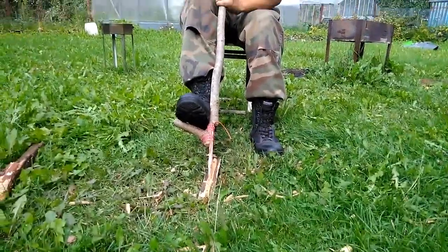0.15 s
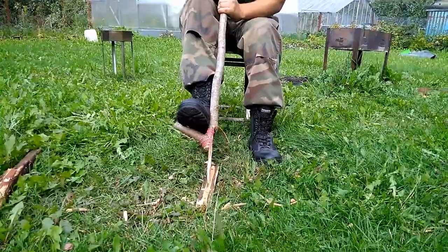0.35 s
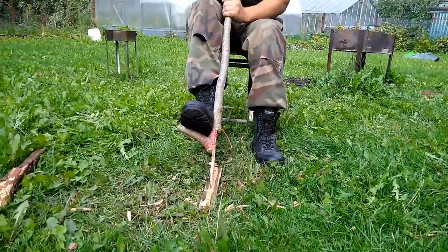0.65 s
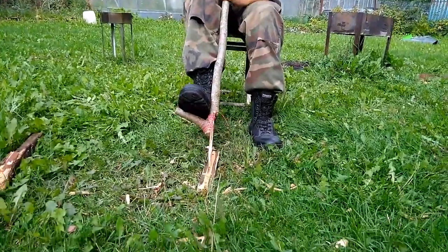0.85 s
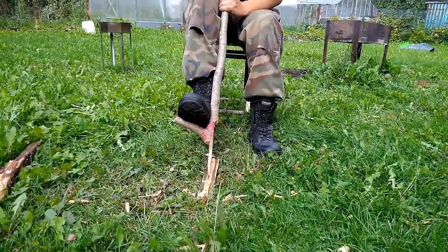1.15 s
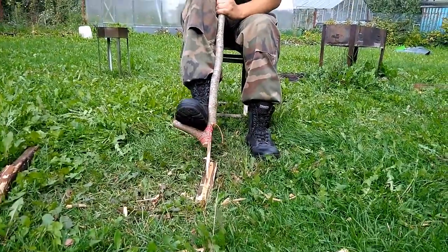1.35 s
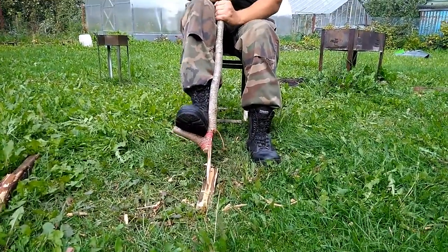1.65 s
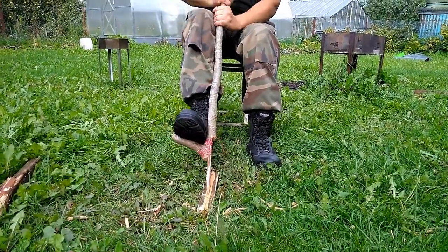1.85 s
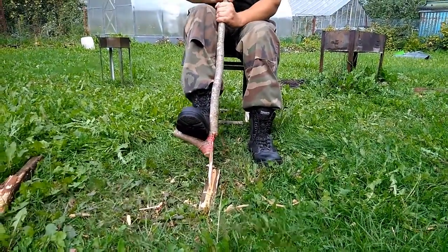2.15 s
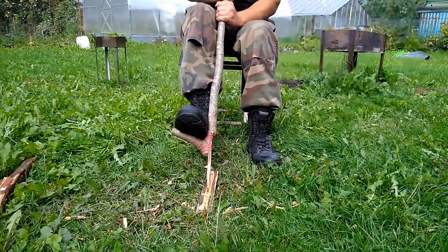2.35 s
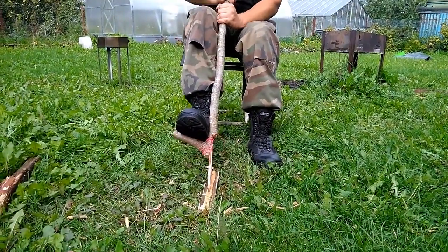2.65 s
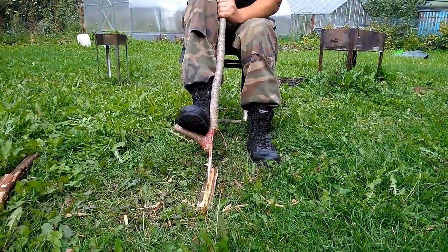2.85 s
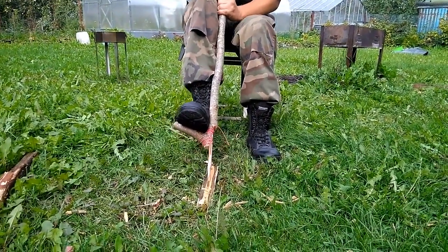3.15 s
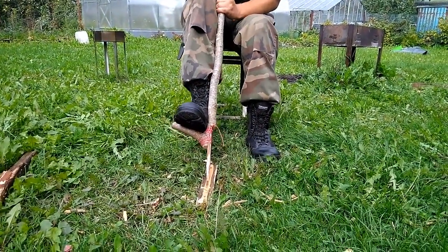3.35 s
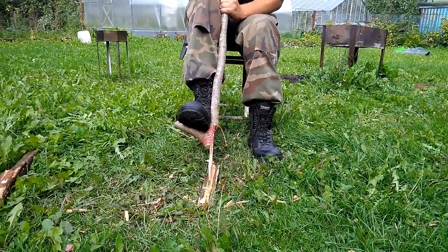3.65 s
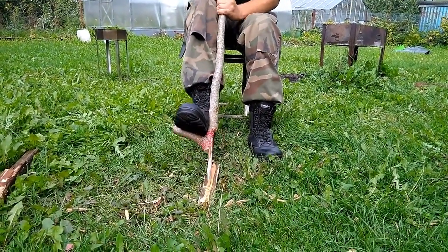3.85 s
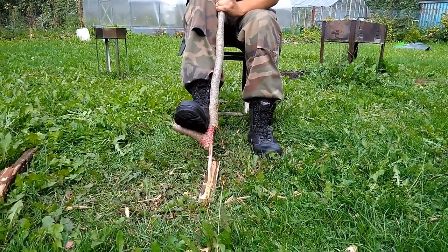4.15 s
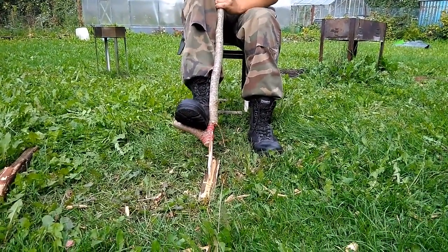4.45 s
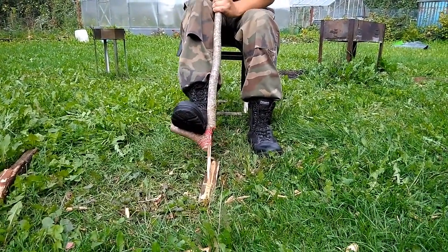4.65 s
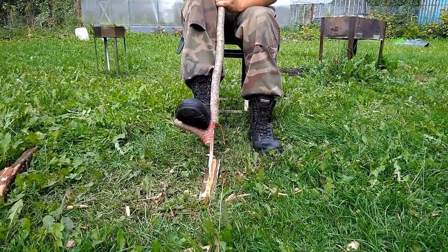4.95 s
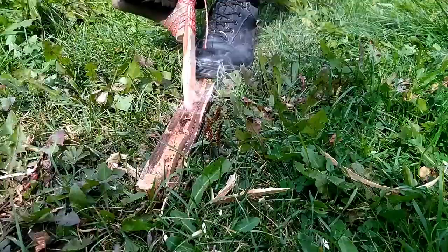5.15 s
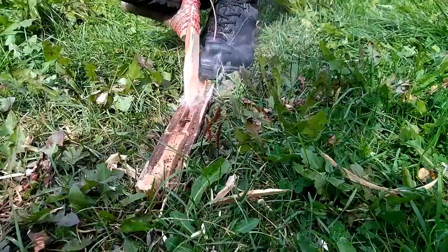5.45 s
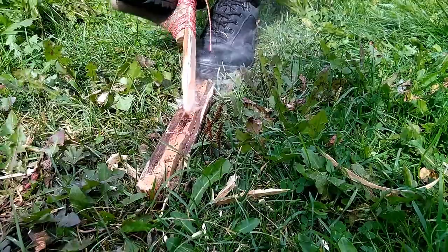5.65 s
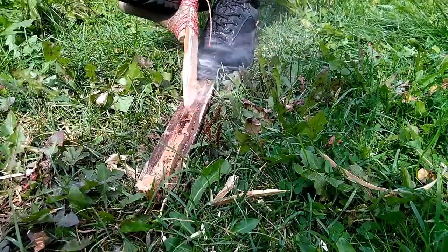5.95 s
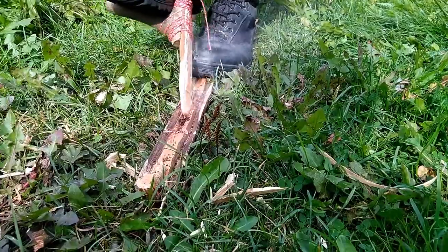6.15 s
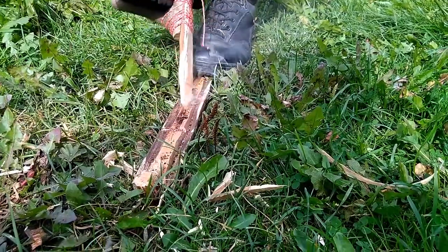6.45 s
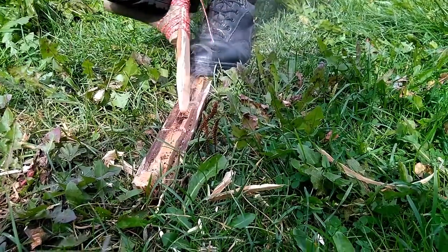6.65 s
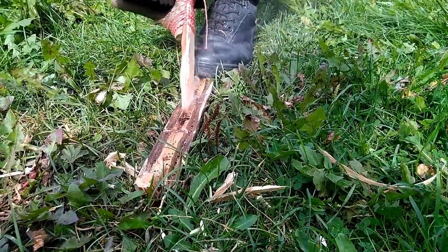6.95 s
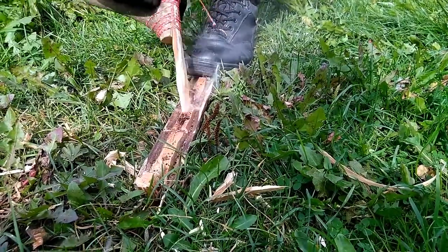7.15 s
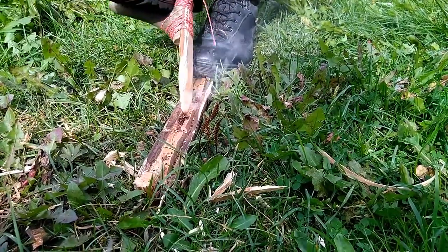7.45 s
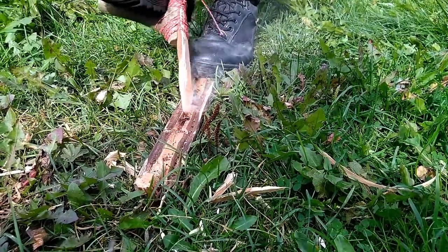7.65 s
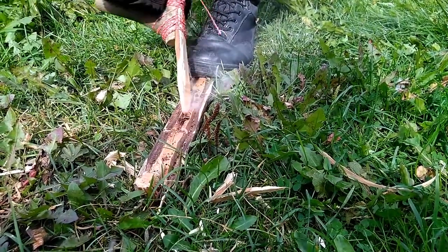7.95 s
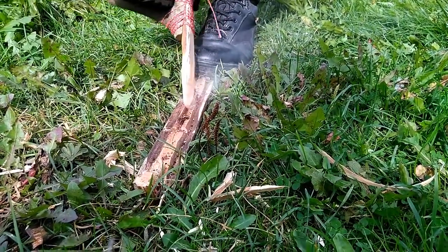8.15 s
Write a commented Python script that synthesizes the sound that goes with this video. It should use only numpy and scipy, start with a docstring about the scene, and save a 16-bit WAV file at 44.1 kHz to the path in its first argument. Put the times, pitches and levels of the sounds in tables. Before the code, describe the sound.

Outdoors on grass, a stick saws quickly to and fro in a dry board's groove, making an unbroken rhythm of hissing, hoarse rasps over a soft ground rumble. Splinters snap near the start and a few hard taps hit the microphone, mostly left. After about five seconds the sound jumps much closer and louder, with deep hum, wooden knocks and bright cracks.

```python
"""Fire plow on a lawn

A stick is driven to and fro in the groove of a dry board, about seven strokes a second. Fibres catch and tear:
dense random impulses, coloured as hiss and rasp. Filtered noise makes the ground rumble, air and rustle.
Noise bursts make snapping splinters; decaying sines make taps on the microphone housing and board knocks;
swept sines make judders. Heard from a few steps away, then from close by, where a deep hum joins in."""
import sys
import numpy as np
from scipy import signal
from scipy.fft import rfft, irfft
from scipy.io import wavfile
from scipy.ndimage import uniform_filter1d

SR = 44100
rng = np.random.default_rng(int(sys.argv[2]) if len(sys.argv) > 2 else 0)


def generate_wav(signal):
    """Clip the signal to [-1, 1] and save it as 16-bit WAV at the path in sys.argv[1]."""
    frames = np.transpose(np.atleast_2d(signal))
    scaled = np.clip(frames, -1, 1) * 32767
    pcm = np.round(scaled).astype(np.int16)
    wavfile.write(sys.argv[1], SR, pcm)


N = 366471

# colour of low outdoor air: (frequency [Hz], level [dB])
AIR_COLOUR = [(25, -32), (38, -10.5), (55, 1.5), (90, -3), (150, -8), (300, -20), (600, -19.5), (1200, -28),
              (3000, -30), (7000, -28), (10000, -32), (16000, -28.5)]
# likeness of left and right: (frequency [Hz], correlation [1])
PORT_LIKENESS = [(60, 0.82), (130, 0.79), (290, 0.64), (640, 0.65), (1400, 0.57), (2400, 0.1), (2900, 1),
                 (3350, 0.86), (3650, 0.52), (4600, 0.06), (6800, 0.1), (15000, 0.071)]
# strokes, pull and push in turn: (start [s], hiss level [dB], rasp level [dB], rumble level [dB],
# share of the stroke at which the tip bites hardest [1], note [Hz])
STROKE_TABLE = [(0.0, -19, -8, -1.5, 0.56, 1910), (0.16, -2, 1.5, 0, 0.52, 1085),
                (0.303, 1.5, 1.3, -2, 0.48, 1077), (0.434, 0, 1, 3.5, 0.59, 1160),
                (0.602, 0.8, 3, 4, 0.44, 1290), (0.771, 1, 0.5, 2, 0.31, 1250),
                (0.934, -1.5, 0, 2, 0.55, 1890), (1.079, 5.2, 5, 4, 0.38, 1463),
                (1.236, -1, -1, -1, 0.37, 1900), (1.377, 1, -0.5, 2.5, 0.43, 1460),
                (1.534, 0.8, -0.5, 0, 0.35, 1895), (1.681, 1.2, 2.7, 1, 0.64, 1360),
                (1.83, 1.5, -1.8, -3.3, 0.3, 1980), (1.988, 0.5, 1.1, 1.5, 0.69, 1543),
                (2.129, -0.3, -1.2, -1, 0.37, 920), (2.27, 1.1, 3, 7, 0.61, 993),
                (2.414, 0.7, -0.5, 0, 0.36, 900), (2.557, 1.5, 2.5, 2.5, 0.57, 1210),
                (2.705, 0.1, 0.2, -5, 0.33, 818), (2.84, 1.2, 2.7, 2, 0.54, 1023),
                (2.978, -0.5, -0.8, -1, 0.46, 826), (3.118, 1.0, 0.9, 4, 0.64, 1250),
                (3.253, -1, -1.5, -2.5, 0.42, 820), (3.398, 1.5, 2, 5.5, 0.43, 958),
                (3.542, 0.7, -1.3, -0.5, 0.3, 820), (3.678, 0.3, 0, 4.5, 0.58, 1380),
                (3.823, -2.6, -4, -1, 0.29, 820), (3.966, 3.5, 1.3, 4.5, 0.61, 950),
                (4.103, -0.3, -2.5, -4, 0.32, 820), (4.244, 0, 1.0, 2, 0.54, 1128),
                (4.379, -0.8, -3.5, -4, 0.34, 985), (4.516, 0.3, -0.7, 2.5, 0.63, 1597),
                (4.647, -1, 0, -3.5, 0.41, 905), (4.781, -2, -2.7, 0.5, 0.53, 1120),
                (4.894, -2.5, -1.5, -3.9, 0.34, 1215), (5.025, -0.3, -3, -3.5, 0.48, 1510),
                (5.138, -9, -6, -3.0, 0.61, 952), (5.177, 2.4, 2, 1.5, 0.31, 823),
                (5.288, 2, -1.2, -2.4, 0.31, 1729), (5.391, 1.8, 1, 2.5, 0.39, 826),
                (5.532, -1, -2.3, 0, 0.31, 1423), (5.644, -4, -2, -1.5, 0.35, 820),
                (5.801, 2, -2.3, 3.5, 0.37, 1896), (5.913, -0.5, 0.4, -0.5, 0.23, 1111),
                (6.051, 0.2, -1.0, 4, 0.27, 1767), (6.176, 0.3, -0.6, -2, 0.33, 1127),
                (6.314, 0.2, -1, 2.5, 0.21, 1770), (6.435, -1, -2, -3.5, 0.54, 1343),
                (6.57, 0.2, -1.5, -2, 0.32, 1410), (6.685, -1.8, -1, 4, 0.32, 1156),
                (6.835, 0.8, -2.8, 0, 0.26, 1728), (6.948, -0.6, -0.6, 3.5, 0.62, 1202),
                (7.102, 1, -0.7, 4.7, 0.27, 1590), (7.238, 0, 1.3, 0, 0.41, 1213),
                (7.36, -2.5, -3.8, 1.5, 0.33, 1656), (7.499, 1.1, -0.3, 3.5, 0.25, 1133),
                (7.622, -1.3, -2.1, 3.5, 0.34, 1548), (7.755, 0.5, 2.5, -3, 0.57, 827),
                (7.898, 4.5, 1.5, 3.5, 0.21, 1940), (8.006, 1.6, -1, 1, 0.44, 997),
                (8.155, -1.1, -4, -1, 0.43, 1550)]
# an average stroke's hiss, rasp and rumble, one row each: (far level [dB], change from close by [dB])
VOICE_LEVELS = [(-51.5, 11), (-57, 13.5), (-56.5, 8)]
# colour of tearing fibres: (frequency [Hz], far left, far right, near left, near right level [dB])
HISS_COLOUR = [(3160, -7, -17.5, -6.5, -8), (3400, -2, -2.5, -12, -15), (3470, 0, -2.5, -16, -13.5),
               (3980, -7, -1.5, -5.5, -3.5), (4430, -2.5, 2, -12.5, -5.5), (5320, -17, -3.5, -22, -1),
               (5700, -14, 1.5, -19, -4), (6500, -9.5, 0, -15, 2.5), (7380, -6, 2, -18, -3),
               (8440, -9, -13.5, -7, -9), (9900, -15.5, -18, -16.5, -24), (10260, -17, -10, -13, -10),
               (12200, -21, -18, -19.5, -13.5), (15500, -14, -13, -21, -17.5)]
# colour of the board's rasp: (frequency [Hz], far left, far right, near left, near right level [dB])
RASP_COLOUR = [(480, -31, -9.5, -14, -9), (602, -2.5, -1, -5, -7), (895, -1.5, -21, -6.5, -8),
               (998, -1.5, 5.5, -2, -3), (1370, -3, -3, -2.5, -3), (1730, -7.5, -7.5, -2.5, -1.5),
               (2290, -1.5, 0.5, -6, -4.5), (2560, 0, 4.5, 0.5, -3), (3080, -8, -15, -15, -14)]
# colour of board and boot rumbling on the ground: (frequency [Hz], level [dB])
RUMBLE_COLOUR = [(70, 2), (130, -1), (190, -4.5), (270, -5), (360, -10), (480, -18), (800, -30.5)]
# colour of the boot shoving the board: (frequency [Hz], level [dB])
SHOVE_COLOUR = [(130, -45), (220, 1), (300, 1.5), (380, -5), (480, -26), (800, -44)]
# dry grass and cloth stirring as the work begins: (time [s], level [dB])
STIR_LEVELS = [(0, -62), (.15, -53.5), (.22, -63), (.4, -52.5), (.7, -59), (1.0, -62), (1.4, -78)]
# colour of grass and cloth: (frequency [Hz], level [dB])
RUSTLE_COLOUR = [(200, -6), (600, -1.5), (1200, 3.5), (2200, -2), (3000, 3.5), (4500, -1.5), (7000, -0.5),
                 (10000, -5), (16000, -14)]
# snapping splinters: (time [s], peak level [dB], left over right [dB], 60 dB decay [s], centre [Hz])
SNAP_TABLE = [(.190, -37, -7, .015, 5500), (0.2215, -25.5, -11, 0.016, 4940), (0.234, -33, -7, 0.035, 5500),
              (.244, -36, -3, 0.16, 5500), (0.262, -31.5, -9, 0.013, 5500), (.277, -34.5, -5, 0.1, 5100),
              (0.315, -35, -9, 0.019, 5000), (.375, -38, -3, .008, 5000), (.659, -43, -8, 0.014, 5500),
              (0.675, -33, -8, .017, 4750), (.785, -35, -4, 0.011, 5640), (1.009, -31.5, -6.5, 0.025, 4900),
              (1.018, -33.5, -10, 0.014, 5466), (2.711, -38, -7, 0.015, 5800),
              (6.047, -30.5, -16, 0.004, 6200), (6.3140, -25, -6, 0.0031, 7200),
              (7.099, -32, -5, 0.006, 6593), (7.2844, -8, -7.5, 0.0065, 7500),
              (7.3649, -25.5, -5, 0.0045, 6070), (7.916, -26, -11, 0.0095, 6414)]
# knocks of the board on the ground: (time [s], level [dB], frequency [Hz], 60 dB decay [s])
KNOCK_TABLE = [(.216, -42, 1290, 0.011), (1.180, -41, 260, 0.046), (1.193, -41, 150.2, 0.073),
               (1.772, -39, 292, 0.024), (1.785, -34, 168, 0.042), (1.879, -51, 1400, .025),
               (2.655, -42.5, 228.5, 0.066), (3.483, -49, 149.8, .05), (4.565, -35, 130.8, 0.035),
               (6.520, -29, 180.9, 0.033), (6.562, -27.5, 435, 0.017), (6.564, -24.5, 160.3, 0.028),
               (7.165, -26.5, 655, 0.022), (7.360, -37, 958.5, .012), (7.802, -31, 559, .018),
               (7.802, -32, 255.6, 0.056), (7.814, -26.5, 179.8, 0.038), (7.862, -14.5, 122, 0.04),
               (7.872, -25.5, 62, 0.12), (7.904, -31, 160, 0.036), (7.956, -36, 175, .04),
               (8.050, -32, 95, 0.078), (8.147, -37.5, 910, .015)]
# taps on the housing by the left port: (time [s], level [dB], contact [s])
TAP_TABLE = [(1.3255, -28, 0.00033), (2.3384, -4.5, 0.00017), (2.8352, -14.5, 0.00041),
             (3.142, -13.5, 0.00038), (4.0481, -8, 0.00012)]
# modes of the housing: (frequency [Hz], level [dB], 60 dB decay [s])
HOUSING_MODES = [(496, -11.5, 0.023), (1105, -6, 0.012), (1365, -5.5, 0.006), (1680, -28, 0.0045),
                 (2730, -20.5, 0.0091)]
# judders of the tip: (time [s], length [s], rise [s], first [Hz], last [Hz], level [dB])
JUDDER_TABLE = [(5.193, 0.099, 0.002, 804, 637, -35.5), (5.411, 0.088, 0.036, 720, 636, -38.5),
                (5.942, 0.026, .008, 1180, 1018, -43), (6.019, 0.016, 0.0043, 2540, 1708, -40),
                (7.155, 0.059, .008, 701, 477, -48.5), (7.797, 0.1, 0.023, 899, 611, -36),
                (8.034, 0.078, 0.031, 652, 587, -38.5)]

MOVE_S = 5.193   # from here on heard from close by
LAST_STROKE_S = 0.14
PORT_LAG_S, FAR_LAG_S = 0.00014, 0.00018   # the left port hears the sound this much later
TIME = np.arange(N) / SR
NEAR = np.clip((TIME - MOVE_S) / 0.003, 0, 1)   # 0 far, 1 near
FREQS = np.maximum(np.fft.rfftfreq(N, 1 / SR), 1)


def from_db(db):
    """Logarithmic level: decibels to amplitude gain."""
    return 10 ** (np.asarray(db) / 20)


def rms_one(x):
    """Power normalization: scale to unit mean square."""
    return x / np.sqrt(np.mean(x ** 2) + 1e-20)


def at_hz(rows, column=1):
    """Spectral interpolation: one column joined on a log-frequency axis."""
    rows = np.array(rows, float)
    return np.interp(np.log(FREQS), np.log(rows[:, 0]), rows[:, column])


def band(x, low_hz, high_hz, order=2):
    """Causal band-pass filtering."""
    edges = [low_hz, min(high_hz, 0.45 * SR)]
    return signal.sosfilt(signal.butter(order, edges, "band", fs=SR, output="sos"), x + 1e-18)


def drift(rate):
    """Random fluctuation: noise through two equal low-pass poles at the rate [Hz], spread 1."""
    r = np.exp(-2 * np.pi * rate / SR)
    raw = rng.standard_normal(N + SR)
    settled = signal.lfilter([1], [1, -2 * r, r * r], raw)[SR:]
    return rms_one(settled)


def ring(x, hz, t60):
    """Damped resonance: a unit click sets off a decaying sine of about height 1."""
    r, w = from_db(-60 / (t60 * SR)), 2 * np.pi * hz / SR
    return signal.lfilter([0, np.sin(w)], [1, -2 * r * np.cos(w), r * r], x + 1e-18)


def two_ears(pair, lag_s=PORT_LAG_S):
    """Interaural coherence: spectra of two signals, blended to a likeness per frequency, the left delayed."""
    mid, side = rfft(pair)
    alike = np.clip(at_hz(PORT_LIKENESS), -0.99, 0.99)
    blend = np.sqrt(1 + alike) * mid + np.sqrt(1 - alike) * side * [[1], [-1]]
    return blend * np.exp(-2j * np.pi * FREQS * [[lag_s], [0]])


def noise(spectrum):
    """Spectral shaping: steady stereo noise of a given colour."""
    shaped = two_ears(rng.standard_normal((2, N))) * from_db(at_hz(spectrum))
    return rms_one(irfft(shaped, N))


def background(air_db=-54, near_air_db=11.5, hum_hz=62.46, hum_db=-43.0, swell_db=-7, swell_s=0.62):
    """Ambient sound: broadband outdoor air, and near by a deep wavering hum that swells from the move on."""
    air_level = air_db + near_air_db * NEAR + 1.0 * drift(13.0)
    air = band(noise(AIR_COLOUR), 37.0, 14800, order=4) * from_db(air_level)
    swell = swell_db * np.clip(1 - (TIME - MOVE_S) / swell_s, 0, 1)
    hum = np.sin(2 * np.pi * hum_hz * TIME + 0.1 * drift(0.92))
    hum = hum * from_db(hum_db + swell + 0.71 * drift(1.0))
    return air + hum * NEAR


def strokes():
    """Reciprocating motion: whether the arm is pushing, and the share of the stroke done, at every moment."""
    turns = [row[0] for row in STROKE_TABLE]
    turns.append(turns[-1] + LAST_STROKE_S)
    done = np.interp(TIME, turns, np.arange(len(turns)))
    return done % 2 >= 1, done % 1


def this_stroke():
    """Stepwise excitation: three levels, biting point and note of the stroke under way at every moment."""
    starts, *columns = np.transpose(STROKE_TABLE)
    row = np.maximum(np.searchsorted(starts, TIME) - 1, 0)
    return [column[row] for column in columns]


def swing(push_peak, pull_peak, sharpness, rest_db):
    """Kinematics: speed rises to a peak part way through each stroke and falls to a floor at the turns."""
    push, along = strokes()
    peak = np.clip(np.where(push, push_peak, pull_peak), 0.1, 0.9)
    speed = np.sin(np.minimum(along / peak, (1 - along) / (1 - peak)) * np.pi / 2)
    return np.hypot(speed ** sharpness, from_db(rest_db))


def pressure():
    """Load dependence: hiss, rasp and rumble gains follow the force of each stroke."""
    levels = [stroke_db + db + near_db * NEAR
              for stroke_db, (db, near_db) in zip(this_stroke(), VOICE_LEVELS)]
    return from_db(uniform_filter1d(np.array(levels), size=300, axis=1))   # soften the steps


def friction(colour, low_hz, high_hz, per_s, size_db):
    """Friction as shot noise: dense fibre catches of uneven size, coloured by wood and listening place."""
    sizes = from_db(size_db * np.minimum(rng.exponential(1, N), 4))
    catches = rng.standard_normal((2, N)) * sizes * (rng.random(N) < per_s / SR)
    gains = from_db([at_hz(colour, column=k) for k in range(1, len(colour[0]))])

    def heard(place_gains, lag_s):
        """Linear filtering: the catches as coloured at one place."""
        coloured = irfft(two_ears(catches, lag_s) * place_gains, N)
        return rms_one(band(coloured, low_hz, high_hz, order=4))

    far_gains, near_gains = np.split(gains, 2)
    return heard(far_gains, FAR_LAG_S) * (1 - NEAR) + heard(near_gains, PORT_LAG_S) * NEAR


def wander(x, low_hz, high_hz, patchy_db, rate, count=4):
    """Position-dependent response: along the groove, the wood favours now one band, now another."""
    edges = np.geomspace(low_hz, high_hz, count + 1)
    out = x
    for low, high in zip(edges, edges[1:]):
        gain = from_db(patchy_db * np.tanh(drift(rate)))
        out = out + (gain - 1) * band(x, low, high, order=1)
    return rms_one(out)


def crumbs(per_s=45, size_db=4, level_db=-2):
    """Brittle fracture: coarser fibres break at random moments, each a tiny tick of decaying noise."""
    sizes = from_db(size_db * np.minimum(rng.exponential(1, N), 3)) * (rng.random(N) < per_s / SR)
    age = TIME[:SR // 200]
    burst = rng.standard_normal((2, len(age))) * from_db(-60 * age / 0.032)
    ticks = signal.fftconvolve(sizes[None], burst, axes=1)[:, :N]
    return rms_one(band(ticks, 5500, 8930, order=3)) * from_db(level_db + np.array([[-14], [-9]]))


def lean(rasp, note, pivot_hz=1400, far_db_per_octave=-0.5, near_db_per_octave=5):
    """Spectral tilt: near by, low notes rasp hollow and high ones thin; far off, slightly the reverse."""
    tilt = from_db(np.log2(note / pivot_hz) * np.where(NEAR, near_db_per_octave, far_db_per_octave))
    low = signal.sosfiltfilt(signal.butter(2, pivot_hz, fs=SR, output="sos"), rasp)
    return low / tilt + (rasp - low) * tilt


def chatter(speed, note, rise=0.12, width_hz=150, pull_db=-4):
    """Stick-slip: uneven slips give a hoarse note that rises with speed and is weaker on the pull."""
    push, _ = strokes()
    phase = 2 * np.pi * np.cumsum(note * (1 + rise * (speed - 1))) / SR
    # random sine and cosine parts broaden the note
    pair = np.array([drift(width_hz) * np.sin(phase) + drift(width_hz) * np.cos(phase) for _ in range(2)])
    return rms_one(irfft(two_ears(pair), N)) * from_db(np.where(push, 0, pull_db))


def plow(snag_db=2.2):
    """Sliding friction: the hiss follows the tip's speed, the rasp its bite; the board drives the ground."""
    hiss_gain, rasp_gain, rumble_gain = pressure()
    *_, bite_at, note = this_stroke()
    far_slide = swing(push_peak=0.58, pull_peak=0.5, sharpness=1.26, rest_db=-16.0)
    near_slide = swing(push_peak=0.57, pull_peak=0.46, sharpness=1.87, rest_db=-18)
    slide = np.where(NEAR, near_slide, far_slide)
    far_bite = swing(bite_at, bite_at, sharpness=1.4, rest_db=-11)
    near_bite = swing(bite_at, bite_at, sharpness=1.7, rest_db=-12.5)
    bite = np.where(NEAR, near_bite, far_bite)

    hiss = friction(HISS_COLOUR, low_hz=2760, high_hz=20000, per_s=12000, size_db=-1.0)
    hiss = wander(hiss, low_hz=3350, high_hz=9900, patchy_db=3.5, rate=25)
    hiss = (hiss + crumbs()) * slide * from_db(1.04)

    rasp = friction(RASP_COLOUR, low_hz=474, high_hz=2660, per_s=2800, size_db=0.0)
    rasp = wander(rasp, low_hz=557, high_hz=2800, patchy_db=4.5, rate=15)
    rasp = rasp * from_db(np.where(NEAR, -0.9, 0.3))
    hoarse = chatter(bite, note) * from_db(np.where(NEAR, -3.5, -9))
    rasp = (lean(rasp, note) + hoarse) * bite
    # the tip snags and frees itself several times within a stroke
    rasp = rasp * from_db(snag_db * np.tanh(drift(70)))

    rumble = band(noise(RUMBLE_COLOUR), 64, 960)
    rumble = rumble * swing(push_peak=0.48, pull_peak=0.34, sharpness=1.1, rest_db=-2) * from_db(-1.35)
    # late in each push the weight comes down on the board; pulls weigh less
    shove = noise(SHOVE_COLOUR) * swing(push_peak=0.67, pull_peak=0.48, sharpness=2.8, rest_db=-28)
    shove = shove * from_db(np.where(NEAR, -11, -3.5)) * from_db(np.where(strokes()[0], 1, -5))

    grip = from_db(0.92 * drift(29.5))
    return grip * (hiss_gain * hiss + rasp_gain * rasp + rumble_gain * (rumble + shove))


def rustle():
    """Random crackling: grass and cloth crinkle unevenly under the shifting boot, dry stalks crackle."""
    crinkle = noise(RUSTLE_COLOUR) + crumbs(per_s=330, size_db=0.0, level_db=-9)
    return crinkle * from_db(np.interp(TIME, *np.transpose(STIR_LEVELS)) + 2 * drift(40))


def crack(s, db, pan_db, t60, hz, edge_db, top_hz, tail_db=-24, tail_t60=0.11, width=1.135, break_db=12):
    """Sudden stress release: a sharp edge, a bright burst around one pitch and a faint short tail."""
    out, age = np.zeros((2, N)), TIME[:SR // 10]
    burst = rng.standard_normal((2, len(age)))
    burst[:, 0] = from_db(break_db)   # the instant of breaking reaches both ports
    decay = from_db(-60 * age / t60)
    tail = from_db(tail_db - 60 * age / tail_t60)
    body = band(burst * (decay + tail), hz / width, hz * width, order=1)
    edge = from_db(edge_db) * burst * decay ** 2
    body = band(body + edge, 3380, top_hz, order=4)
    body = body / np.abs(body).max(axis=1, keepdims=True)
    at = round(s * SR)
    out[:, at:at + len(age)] = body * from_db([[db + pan_db / 2], [db - pan_db / 2]])
    return out


def snaps():
    """Fracture: splinters break, each at its own pitch."""
    return sum(crack(*snap, edge_db=-22.5, top_hz=17000) for snap in SNAP_TABLE)


def knocks(upper_ratio=1.635, upper_db=-8, thud_db=-14):
    """Damped bending: two board modes, which the turf soon damps, and a rough thud of the earth beneath."""
    out, age = np.zeros(N), TIME[:SR // 8]
    for s, db, hz, t60 in KNOCK_TABLE:
        at, phase = round(s * SR), 2 * np.pi * hz * age
        decay = from_db(-60 * age / t60)
        modes = np.sin(phase) - from_db(upper_db) * np.sin(upper_ratio * phase)
        earth = band(rng.standard_normal(SR // 2), hz / 2, hz * 1.62, order=3)
        thud = from_db(thud_db) * rms_one(earth)[-len(age):]
        out[at:at + len(age)] += from_db(db) * decay * (modes + thud)
    return band(out, 40, 2200, order=4)


def taps(right_db=-26, rattle_db=-27, rattle_t60=0.04):
    """Impact excitation: taps ring the housing and a dull rattle, mostly left; longer contact is duller."""
    clicks, age = np.zeros(N), TIME[:SR // 10]
    for s, db, contact_s in TAP_TABLE:
        press = np.hanning(round(contact_s * SR) + 2)
        at = round((s - contact_s / 2) * SR)
        clicks[at:at + len(press)] = from_db(db) * press / press.sum()
    rung = sum(from_db(db) * ring(clicks, hz, t60) for hz, db, t60 in HOUSING_MODES)
    shaken = signal.fftconvolve(clicks, from_db(rattle_db - 60 * age / rattle_t60))[:N]
    rattle = shaken * rms_one(band(rng.standard_normal(N), 200, 890, order=2))
    return (band(rung, 576, 3100, order=3) + rattle) * from_db([[0], [right_db]])


def rebounds(delay_s=0.0075, full_tap_db=-5.5, growth=2.54):
    """Elastic recoil: the housing ticks as it springs back, growing by 2.54 dB per dB of tap."""
    return sum(crack(s + delay_s, full_tap_db + growth * db, pan_db=17, t60=0.0098,
                     hz=6900, edge_db=3, top_hz=14300) for s, db, _ in TAP_TABLE)


def judders(jitter=0.15, overtone_db=-12, crunch_db=-9.0):
    """Stick-slip: the tip slips unevenly, slower as it digs in; each slip crunches fibres."""
    out, waver = np.zeros(N), 1 + jitter * drift(222.4)
    crunch = from_db(crunch_db) * rms_one(band(rng.standard_normal(N), 600, 3100, order=4))
    for s, length, rise, first_hz, last_hz, db in JUDDER_TABLE:
        along = np.clip((TIME - s) / length, 0, 1)
        pitch = (first_hz + (last_hz - first_hz) * along) * waver
        phase = 2 * np.pi * np.cumsum(pitch) / SR
        slips = np.sin(phase) + from_db(overtone_db) * np.sin(2 * phase) + crunch * (1 + np.cos(phase))
        envelope = np.clip((TIME - s) / rise, 0, 1) * np.sqrt(1 - along)
        out += from_db(db) * envelope * slips
    return out * from_db(2 * drift(110)) * from_db([[0.6], [-0.6]])


def scene():
    """Superposition: all sources add in the open air, without echoes."""
    return background() + plow() + rustle() + snaps() + knocks() + taps() + rebounds() + judders()


def record(dry):
    """Band limiting: a steep elliptic low-pass cuts the top above 16 kHz."""
    return signal.sosfilt(signal.ellip(10, 0.2, 80, 16000, fs=SR, output="sos"), dry)


dry = scene()
out = record(dry)
generate_wav(out)
```